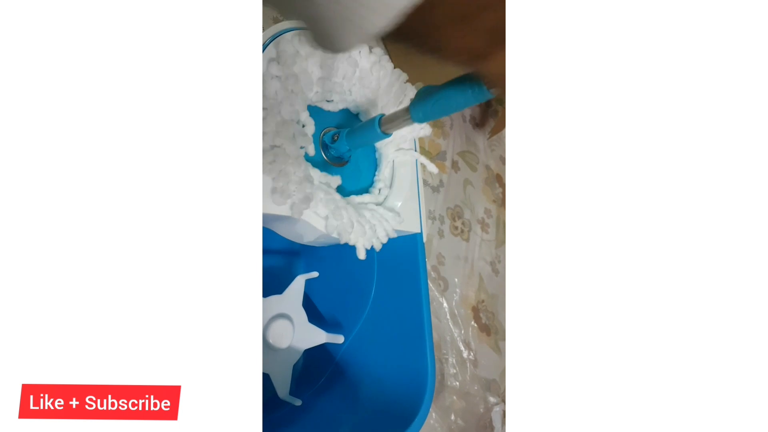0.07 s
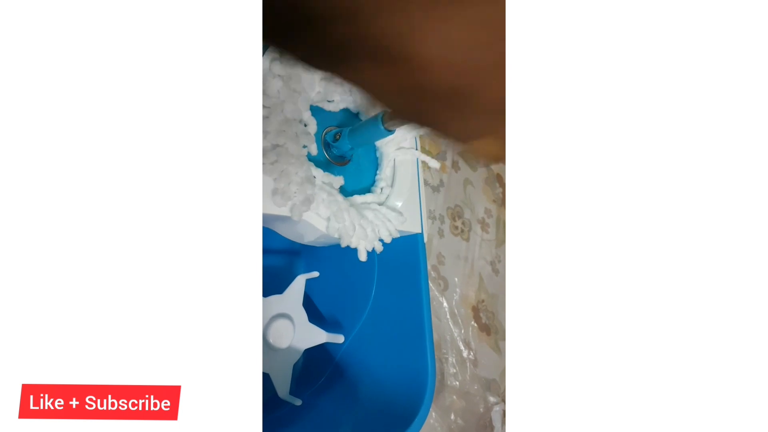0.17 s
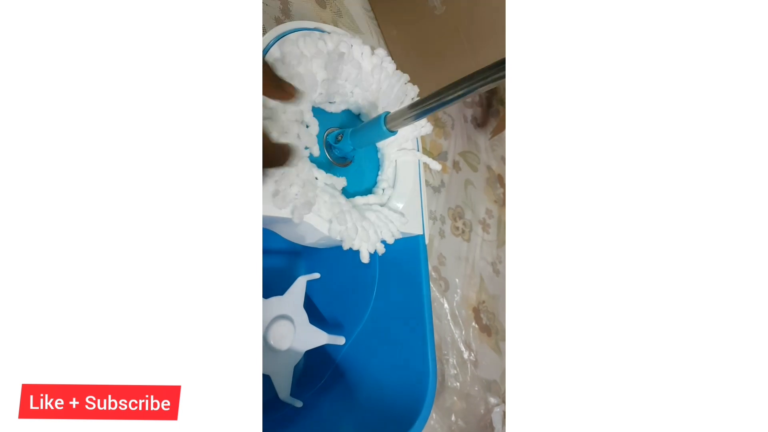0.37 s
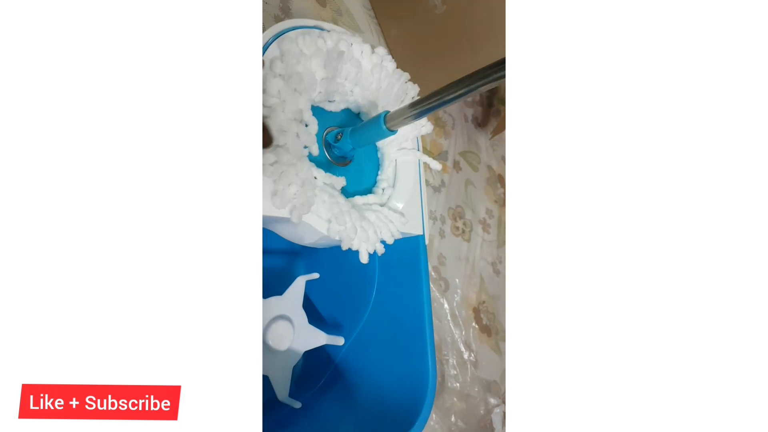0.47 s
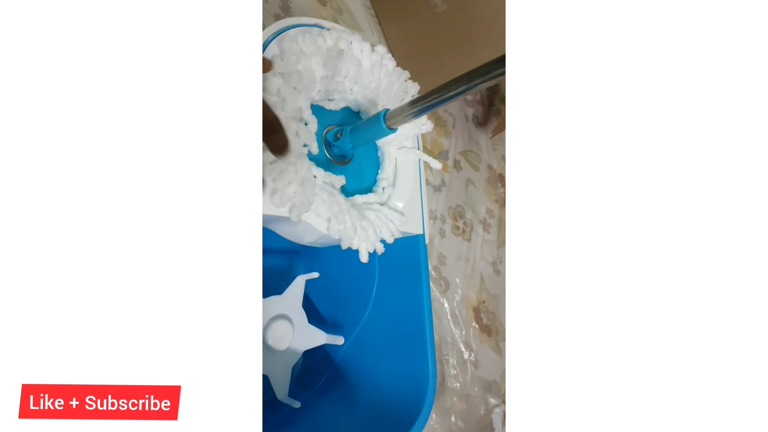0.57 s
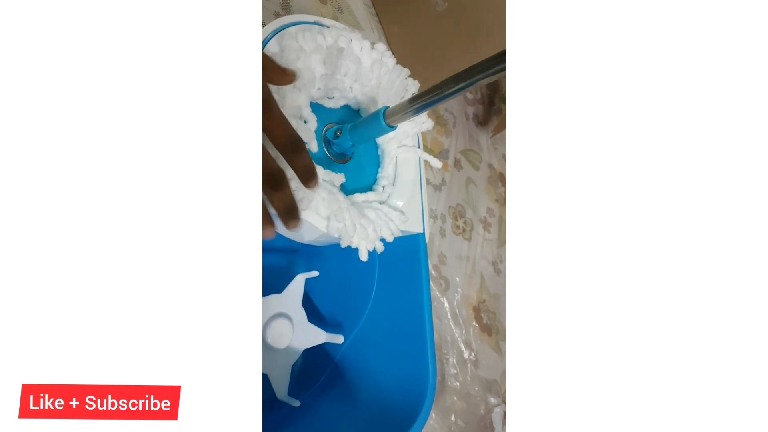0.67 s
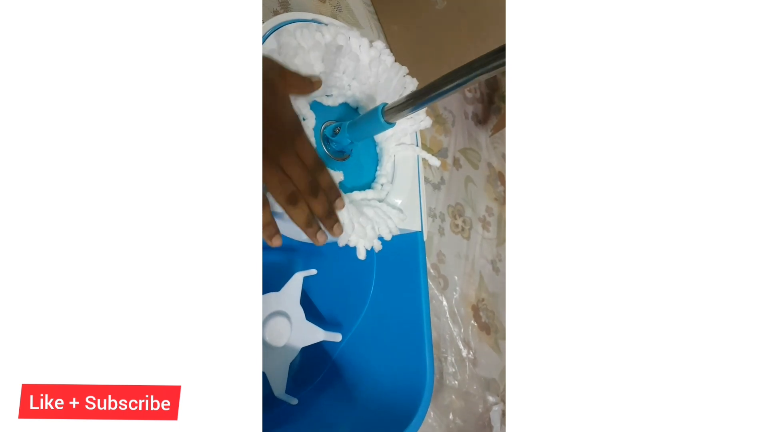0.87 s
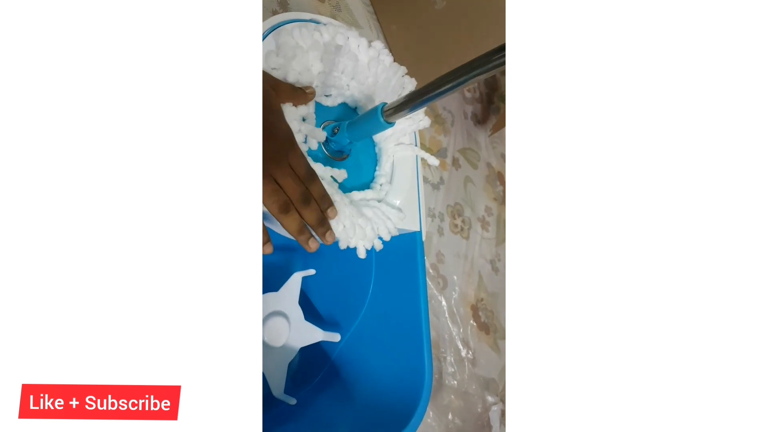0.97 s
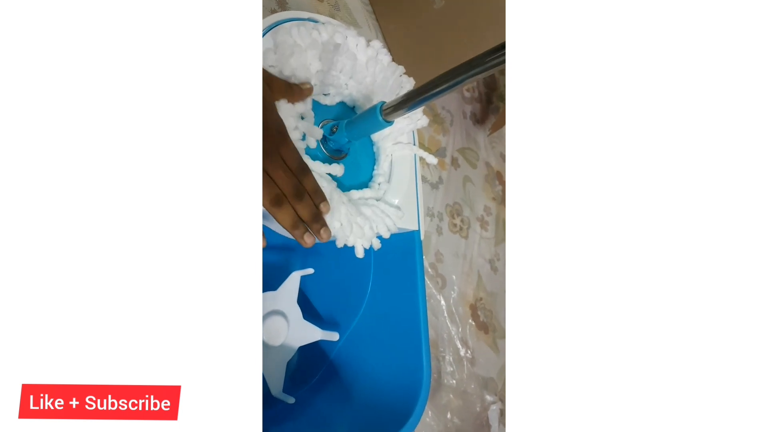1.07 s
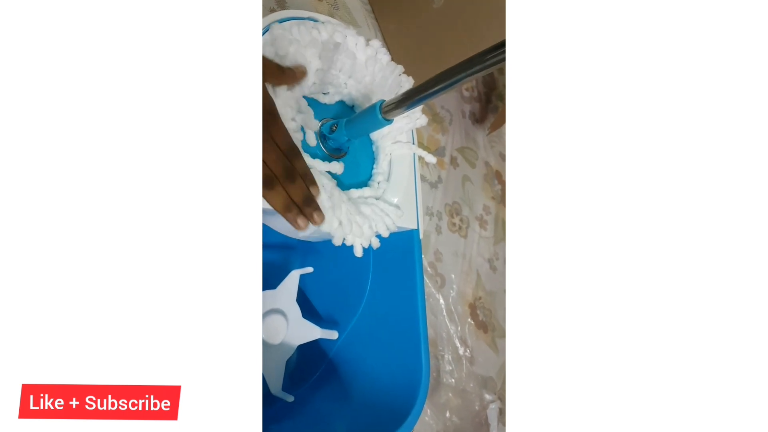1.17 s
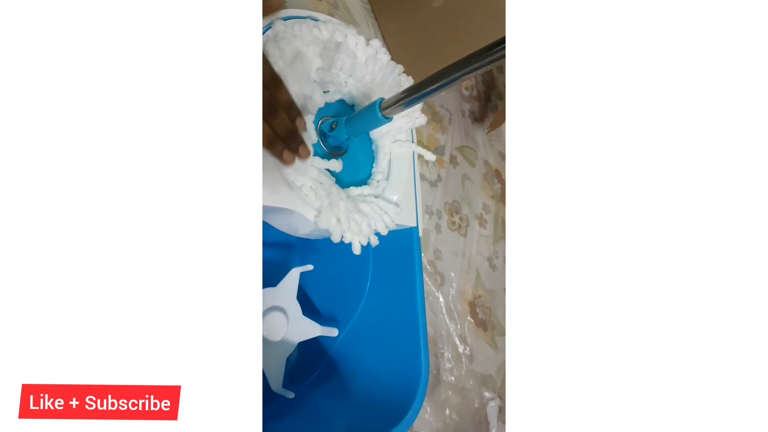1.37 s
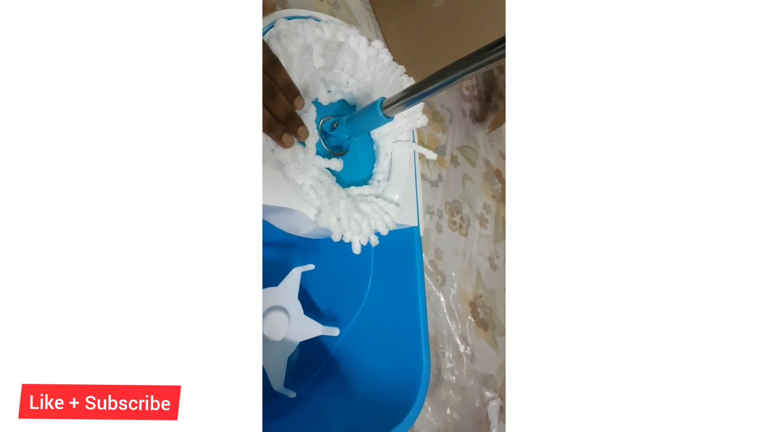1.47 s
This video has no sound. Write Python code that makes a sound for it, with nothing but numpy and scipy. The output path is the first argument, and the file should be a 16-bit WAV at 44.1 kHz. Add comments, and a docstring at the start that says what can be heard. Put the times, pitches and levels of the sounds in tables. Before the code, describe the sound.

A plastic mop bucket knocked with a hollow boom, amid cloth rustling and small pops.

```python
"""Mop in a plastic bucket

A hand works a mop head and its cloth in a plastic bucket, close to the microphone, in a quiet room.
The cloth rustles, with short scratches and ticks. The plastic slips with dull pops.
One blow sets off a low, ringing boom, which swells again several times as it fades."""
import sys
import numpy as np
from scipy import signal
from scipy.fft import rfft, irfft
from scipy.io import wavfile
from scipy.ndimage import uniform_filter1d

SR = 44100
rng = np.random.default_rng(int(sys.argv[2]) if len(sys.argv) > 2 else 0)


def inscribe(sig):
    """Save sig as 16-bit PCM at rate SR to the path in sys.argv[1].

    A 1-D sig is mono; a 2-D sig holds one channel per row.
    Samples are clipped to [-1, 1] before scaling.
    """
    pcm = np.round(np.clip(np.atleast_2d(sig).T, -1, 1) * 32767)
    wavfile.write(sys.argv[1], SR, pcm.astype(np.int16))


N = 66150

# cloth band levels: (time [s], low [dB], low mid [dB], mid [dB], treble [dB], top [dB])
RUSTLE_LEVELS = [(0, -49, -46, -46.5, -68, -51.5), (0.037, -51.5, -56.5, -53.5, -80, -53.5),
                 (0.077, -43.5, -44, -48, -52, -53), (.12, -45.5, -47, -50.5, -51, -48.5),
                 (0.192, -46, -43.5, -48.5, -59, -50.5), (0.239, -59.5, -49, -55.5, -49, -56.5),
                 (.30, -59, -53.5, -55.5, -58, -74), (0.346, -40.5, -51, -53, -57, -48.5),
                 (0.394, -55.5, -50.5, -57.5, -48.5, -49), (0.424, -38, -44.5, -54.5, -56.5, -87),
                 (.50, -67, -63, -74, -69, -73), (.59, -55, -73, -89, -78, -79),
                 (.70, -60, -64, -89, -80, -74), (0.793, -55.5, -63, -79, -74, -76),
                 (0.817, -52.5, -58, -68, -55.5, -58), (0.86, -54.5, -51, -56, -56, -50.5),
                 (0.883, -61, -52.5, -60.5, -61, -92), (0.932, -60, -65.5, -70, -70, -83),
                 (1.0, -68.5, -75, -78, -77.5, -110), (1.12, -60.5, -87, -70.5, -79.5, -78),
                 (1.14, -60.5, -77, -61, -70, -73.5), (1.21, -68, -85, -70, -78.5, -78.5),
                 (1.289, -67.5, -74, -67.5, -70, -70.5), (1.40, -56, -72, -77, -69, -84),
                 (1.422, -58.5, -66, -67, -56, -62.5), (1.455, -58.5, -62, -66.5, -70, -67),
                 (1.5, -56, -68, -67, -64, -66)]
# spectral shape of each cloth band: (frequency [Hz], relative density [dB])
LOW_SHAPE = [(40, -9), (80, -0.5), (150, 6), (215, 0), (265, 6.5), (330, -2.5), (500, 2), (900, -3)]
LOW_MID_SHAPE = [(500, -4.5), (1050, 5.5), (1250, 2), (1430, 4.5), (1670, -2), (1900, 1), (2500, -7)]
MID_SHAPE = [(1500, -2.5), (2450, 3.5), (2800, 4.5), (3300, -0.5), (5000, -1.5)]
TREBLE_SHAPE = [(3500, 0.52), (5500, 2), (6500, 0), (8500, 0), (10000, -2)]
TOP_SHAPE = [(8000, 6), (10000, -0.5), (12800, -5), (14500, -4), (15200, -7.5), (15800, 0)]
# room hiss: (frequency [Hz], relative density [dB])
FLOOR_SHAPE = [(12, -40), (20, -2.5), (352, -5), (1870, -13.5), (2470, -8), (4570, -11.5), (7970, -19.5),
               (9690, -17), (15600, -15.5)]
# scratches and ticks: (time [s], level [dB], centre [Hz], width [Hz], decay [ms])
SCRATCH_EVENTS = [(.008, -42.5, 10050, 3700, 10), (.025, -52, 10000, 5000, 8),
                  (0.042, -44.5, 9300, 4000, 7.4), (.060, -45, 8700, 1500, 5.7),
                  (0.068, -41.5, 7500, 2500, 3.2), (0.077, -44.5, 1410, 148, 37),
                  (0.083, -44.5, 1860, 150, 23), (.167, -44.5, 1060, 300, 5.1),
                  (0.216, -35.5, 2400, 405, 3.2), (0.227, -33.5, 926, 300, 1.7), (.252, -44, 2470, 300, 20),
                  (.287, -39.5, 1510, 397, 7.2), (.396, -38.5, 2320, 3100, 11.5),
                  (0.459, -59.5, 9200, 1500, 4.4), (0.611, -53.5, 1020, 586, 8.6),
                  (0.653, -55, 1850, 2520, 13), (.745, -57.5, 2750, 1200, 4.4), (.818, -54, 2730, 773, 7.2),
                  (.834, -45, 1300, 614, 3.7), (0.857, -37.5, 1630, 890, 5.6),
                  (0.8629, -48, 1720, 1500, 3.4), (0.861, -51.5, 4280, 780, 11),
                  (.888, -76, 9000, 5000, 2.3), (0.915, -59, 6650, 1500, 5.5), (0.901, -54, 3260, 605, 3.1),
                  (1.13, -73, 9900, 1467, 89), (1.22, -76, 10000, 1200, 130),
                  (1.255, -63.5, 2500, 1395, 2.5), (1.376, -61, 3470, 2940, 2.7),
                  (1.4154, -46, 2500, 1980, 3), (1.416, -51.5, 7950, 12200, 1.1),
                  (1.438, -53.5, 7800, 4000, 3)]
# plastic slips: (time [s], level [dB], rise [ms], time to back swing [ms], polarity [+/-1])
SLIP_POPS = [(.0653, -27, .5, 1.5, -1), (.1155, -33, .5, 1.8, -1), (.1363, -27, .25, 1.1, 1),
             (.1568, -27, .2, .9, 1), (.1850, -21, .3, .9, 1), (.2062, -16.5, .2, .8, 1),
             (.2706, -24.5, .25, .8, 1), (.3073, -21.5, .18, .6, 1), (.2150, -33, 1.5, 4, -1),
             (1.0515, -45, 1.9, 5, -1), (1.0720, -48, 1.2, 3.5, 1), (1.0900, -44, 1.1, 4, -1)]
# blow, then softer swells and a faint late knock:
# (time [s], level [dB], contact [ms], thud re level [dB])
BOOM_PULSES = [(.3993, -2, 1.0, -.8), (.4205, -17, 1.1, -14), (.4485, -8, 1.2, -12), (.4750, -15, 1.5, -24),
               (.5150, -19, 1.6, -24), (.5540, -20, 1.6, -24), (.6080, -28, 1.5, -24),
               (.6500, -32, 1.5, -24), (.8625, -30, 1.1, -5), (.9060, -32, 1.6, -24)]
# low resonances of the boom after the knock: (frequency [Hz], level [dB], T60 [s], polarity [+/-1])
BOOM_MODES = [(131.4, -33, 0.1, -1), (165.7, -35.5, 0.42, 1), (190.4, -24, .25, -1), (221, -28, 0.22, 1),
              (255.3, -18, 0.17, 1), (269.2, -15.5, 0.17, 1), (306.4, -14.5, 0.088, 1), (363, -25, .15, -1),
              (419.5, -28.5, 0.15, 1), (417, -35.5, 0.067, -1), (469.4, -34, .25, 1), (536, -31, 0.1, -1),
              (646, -17.5, .08, 1), (626, -30.5, .2, -1)]
# room decay: (frequency [Hz], T60 [s])
ROOM_T60 = [(100, 0.59), (300, 0.46), (800, 0.39), (3000, 0.64), (12000, .2)]

CROSSOVERS_HZ = 750, 2000, 4500, 9000
PATCHY_DB, FLICKER_DB = (1.9, 3.5, 1.6, 2.4, 1.8), (0.97, 2.1, 0.8, 1.6, 0.77)  # rms, per cloth band
FRAMES = N // 128 + 5


def gain(db):
    return 10 ** (np.asarray(db) / 20)


def unit_rms(x):
    return x / np.sqrt(np.mean(x ** 2) + 1e-20)


def curve_at(points, hz):
    knots_hz, values = np.transpose(points)
    return np.interp(np.log(hz + 1), np.log(knots_hz + 1), values)


def add(mix, start_s, sound):
    part = mix[round(start_s * SR):][:len(sound)]
    part += sound[:len(part)]


def high_pass(x, hz, order):
    return signal.sosfilt(signal.butter(order, hz, "high", fs=SR, output="sos"), x)


def band_noise(shape, low_hz, high_hz, patchy_db, flicker_db=0):
    """Unit-rms shaped noise with random time-frequency patches and a level offset per frame."""
    hz = np.fft.rfftfreq(512, 1 / SR)
    real, imag, patches = rng.standard_normal((FRAMES, 257, 3)).T
    patches = uniform_filter1d(patches, size=7, axis=0)
    patches = unit_rms(uniform_filter1d(patches, size=5, axis=1))
    band = 1 / np.sqrt((1 + (low_hz / (hz + 1)) ** 6) * (1 + (hz / high_hz) ** 6))
    level_db = curve_at(shape, hz)[:, None] + patchy_db * patches + flicker_db
    spectra = (real + 1j * imag) * band[:, None] * gain(level_db)
    return unit_rms(signal.istft(spectra, nperseg=512, noverlap=384)[1][:N])


def cloth_rustle():
    """Rubbed cloth: five noise bands with separate envelopes and one shared flicker."""
    out, t = np.zeros(N), np.arange(N) / SR
    times_s, *levels_db = np.transpose(RUSTLE_LEVELS)
    edges_hz = [1, *CROSSOVERS_HZ, SR]
    flicker = unit_rms(uniform_filter1d(rng.standard_normal(FRAMES), size=2))
    for k, shape in enumerate([LOW_SHAPE, LOW_MID_SHAPE, MID_SHAPE, TREBLE_SHAPE, TOP_SHAPE]):
        noise = band_noise(shape, edges_hz[k], edges_hz[k + 1], PATCHY_DB[k], FLICKER_DB[k] * flicker)
        out += gain(np.interp(t, times_s, levels_db[k])) * noise
    return out


def room_noise(hiss_db=-73, rumble_db=-63, rumble_hz=(34, 90)):
    """Quiet room: faint broadband hiss and low rumble."""
    hiss = band_noise(FLOOR_SHAPE, low_hz=0.77, high_hz=SR, patchy_db=0.58)
    band_pass = signal.butter(2, rumble_hz, "band", fs=SR, output="sos")
    rumble = unit_rms(signal.sosfilt(band_pass, rng.standard_normal(N)))
    return gain(hiss_db) * hiss + gain(rumble_db) * rumble


def scratches(rise_fraction=0.097, size=8192):
    """Noise puffs around one pitch each: fast rise, Gaussian decay."""
    out, t_ms = np.zeros(N), np.arange(size) * 1000 / SR
    hz = np.fft.rfftfreq(size, 1 / SR)
    for start_s, db, centre_hz, width_hz, decay_ms in SCRATCH_EVENTS:
        age = t_ms / decay_ms
        envelope = np.minimum(age / rise_fraction, 1) * np.exp(-age ** 2)
        band = 1 / (1 + (2 * (hz - centre_hz) / width_hz) ** 2)
        puff = envelope * irfft(rfft(rng.standard_normal(size)) * band)
        add(out, start_s, gain(db) * puff * np.linalg.norm(envelope) / np.linalg.norm(puff))
    return out


def plastic_pops(decay_ratio=2.4):
    """Slipping plastic: a sharp rise, then a slowing swing that dies without ringing."""
    out, t_ms = np.zeros(N), np.arange(-300, 1700) * 1000 / SR
    for peak_s, db, rise_ms, swing_ms, polarity in SLIP_POPS:
        rise = np.exp(-(np.minimum(t_ms, 0) / rise_ms) ** 2)
        age = np.maximum(t_ms, 0) / swing_ms
        swing = np.exp(-age / decay_ratio) * np.cos(np.pi * np.sqrt(age))
        add(out, peak_s + t_ms[0] / 1000, polarity * gain(db) * rise * swing)
    dulled = uniform_filter1d(out, size=8)
    return high_pass(dulled, hz=50, order=2)


def bucket_boom(thud_hz=445, ring_lag_s=0.0022, ring_rise_s=0.00088):
    """Each pulse: a short thud, then a smooth push that excites the low resonances."""
    out, t = np.zeros(N), np.arange(SR // 2) / SR
    ring = sum(polarity * gain(db - 60 * t / t60_s) * np.sin(2 * np.pi * hz * t)
               for hz, db, t60_s, polarity in BOOM_MODES)
    ring = high_pass(ring * np.minimum(t / ring_rise_s, 1), hz=110, order=3)
    offset_s = np.arange(-220, 220) / SR
    for pulse_s, db, contact_ms, thud_db in BOOM_PULSES:
        start_s = pulse_s + offset_s[0]
        contact_phase = offset_s * 1000 / contact_ms
        thud = -np.exp(-0.5 * contact_phase ** 2) * np.sin(2 * np.pi * thud_hz * offset_s)
        add(out, start_s, gain(db + thud_db) * thud)
        push = np.exp(-0.5 * (2.5 * contact_phase) ** 2)
        add(out, start_s + ring_lag_s, gain(db) * np.convolve(push / push.sum(), ring))
    return out


def room_reverb(x):
    """Sparse reflections of random sign; each frequency decays at its own T60."""
    taps, slots = np.zeros(SR), np.arange(200, SR - 20, 20)
    taps[slots + rng.integers(0, 20, len(slots))] = rng.choice([-1., 1.], len(slots))
    hz, t, spectra = signal.stft(taps, SR, nperseg=256)
    decay = gain(-60 * t / curve_at(ROOM_T60, hz)[:, None])
    tail = signal.istft(spectra * decay, SR, nperseg=256)[1]
    return signal.fftconvolve(x, tail / np.linalg.norm(tail))[:N]


def scene(handling_send_db=-12, boom_send_db=-10.5):
    """Scratches, pops and boom with reverb, over dry rustle and room noise. Mono."""
    handling = scratches() + plastic_pops()
    boom = bucket_boom()
    background = room_noise()
    reverb = room_reverb(gain(handling_send_db) * handling + gain(boom_send_db) * boom)
    return (cloth_rustle() + background + handling + boom + reverb)[None]


def record(dry, bass_cut_hz=33, band_limit_hz=15720):
    """Microphone bass cut and band limit."""
    low_pass = signal.firwin(1023, band_limit_hz, window=("kaiser", 9), fs=SR)
    return signal.oaconvolve(high_pass(dry, bass_cut_hz, order=3), low_pass[None], "same")


dry = scene()
out = record(dry)
inscribe(out)
```